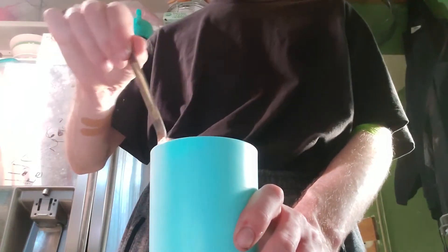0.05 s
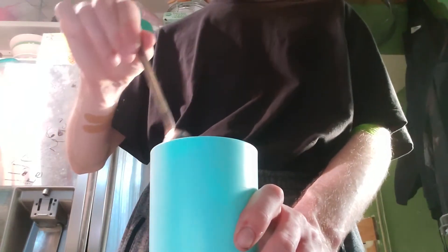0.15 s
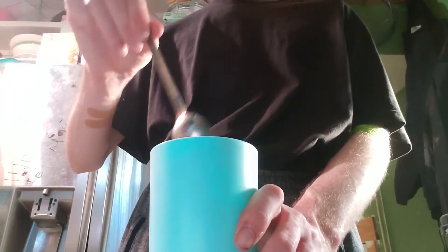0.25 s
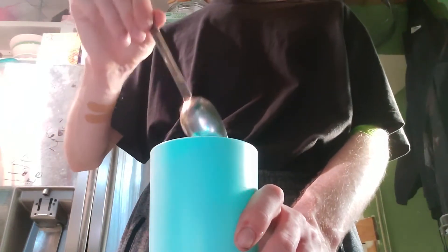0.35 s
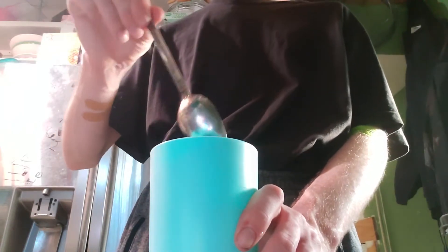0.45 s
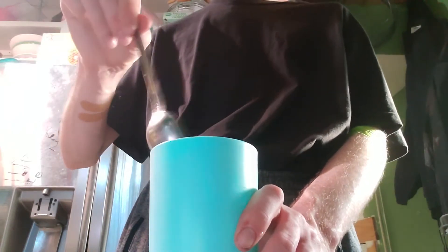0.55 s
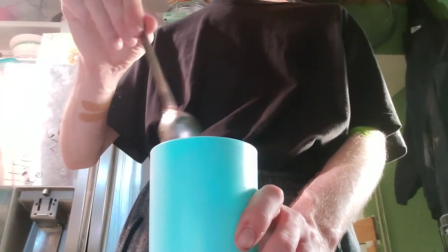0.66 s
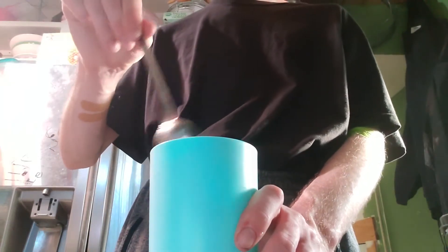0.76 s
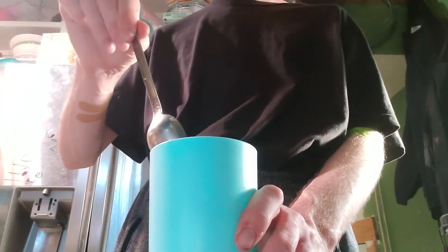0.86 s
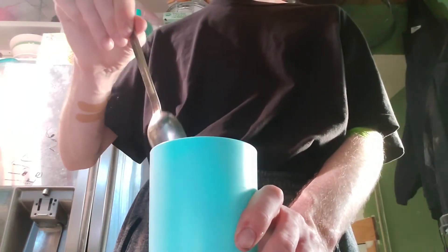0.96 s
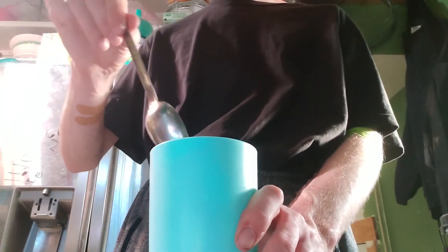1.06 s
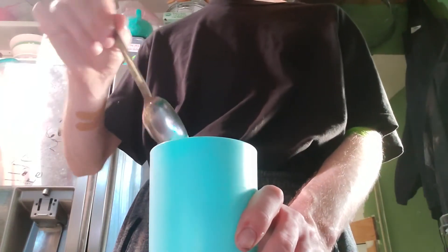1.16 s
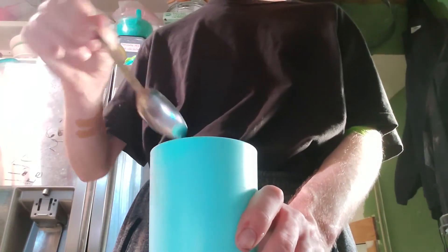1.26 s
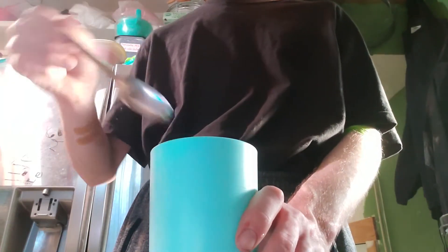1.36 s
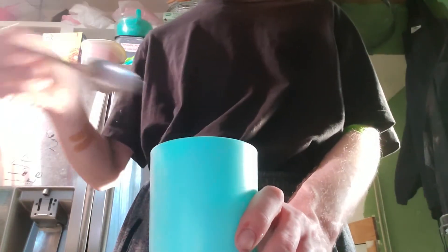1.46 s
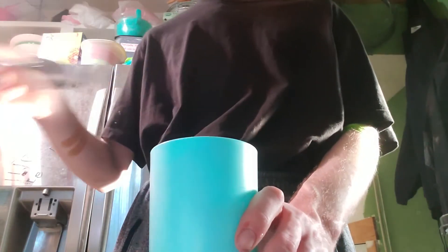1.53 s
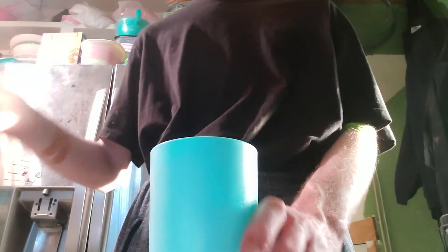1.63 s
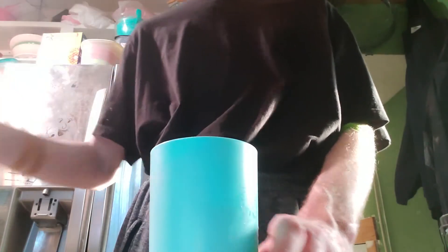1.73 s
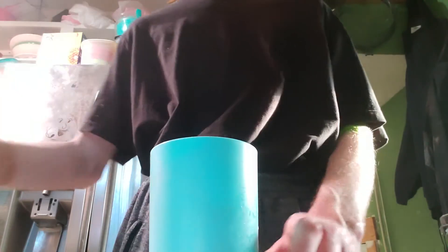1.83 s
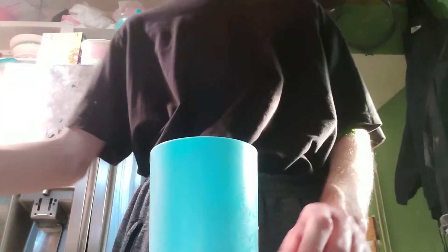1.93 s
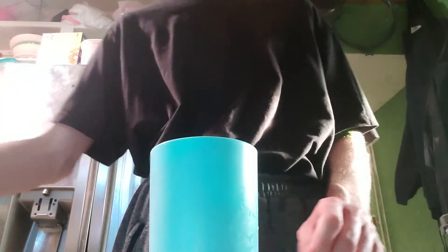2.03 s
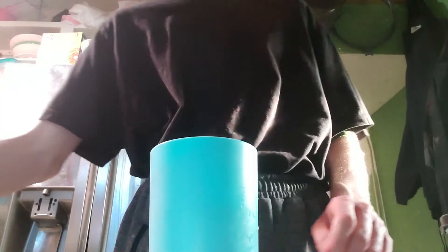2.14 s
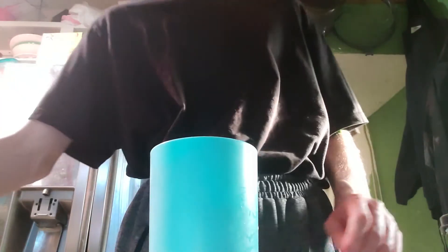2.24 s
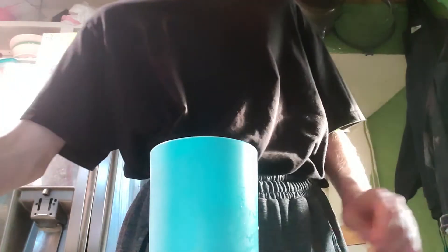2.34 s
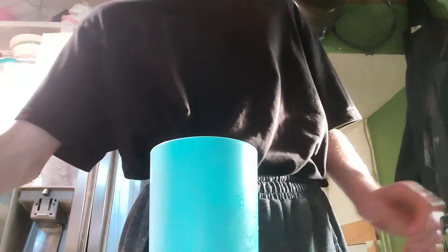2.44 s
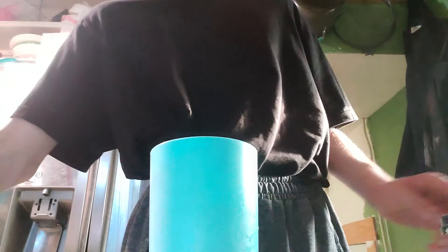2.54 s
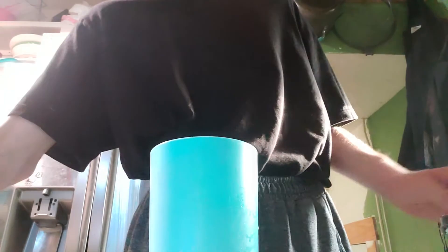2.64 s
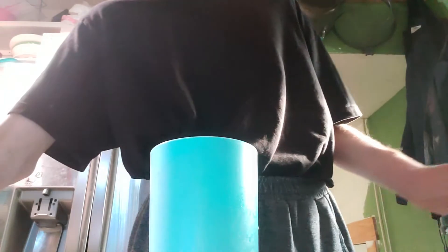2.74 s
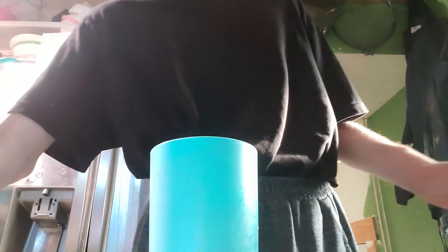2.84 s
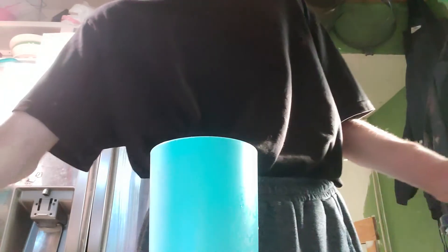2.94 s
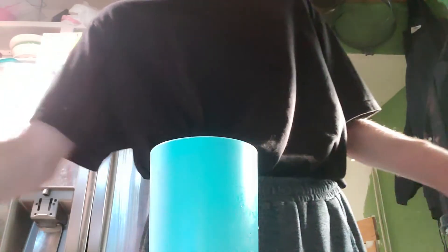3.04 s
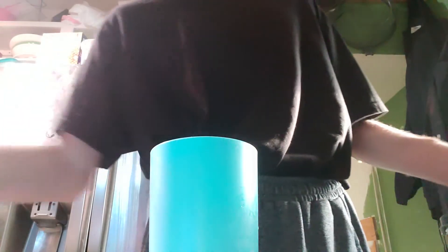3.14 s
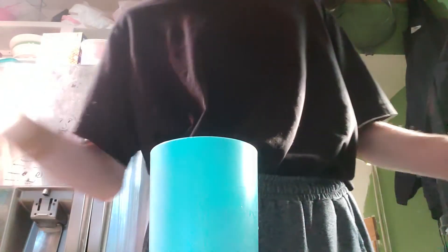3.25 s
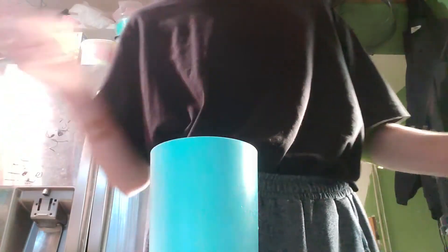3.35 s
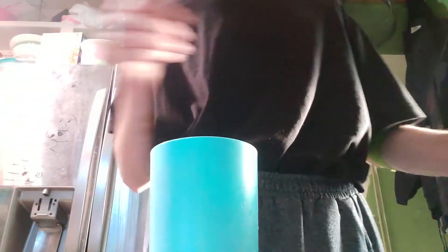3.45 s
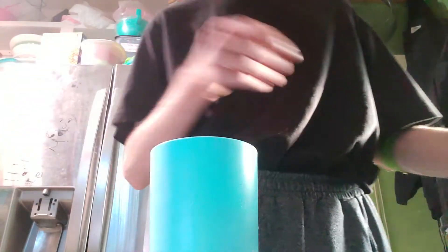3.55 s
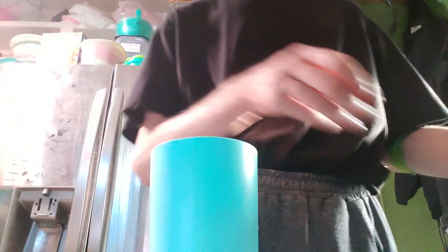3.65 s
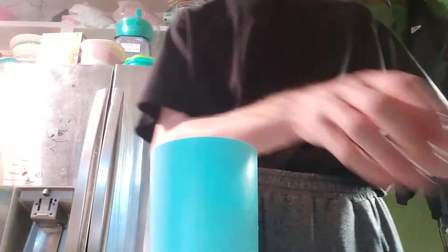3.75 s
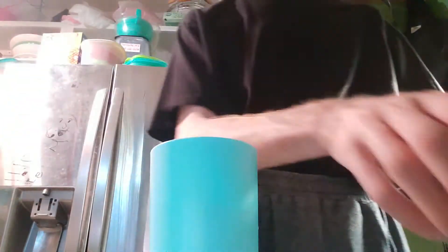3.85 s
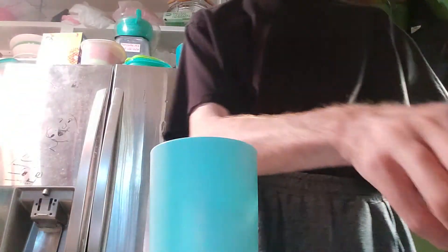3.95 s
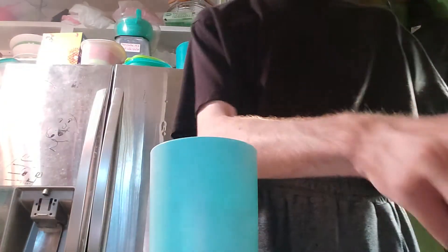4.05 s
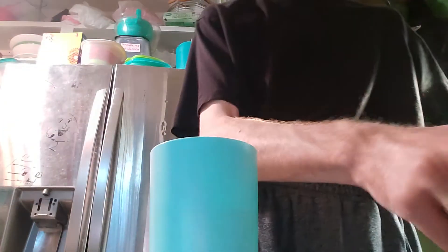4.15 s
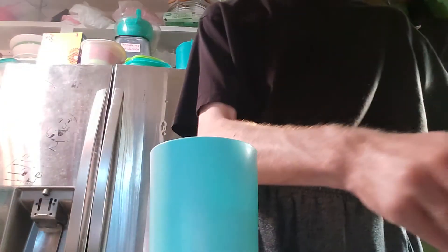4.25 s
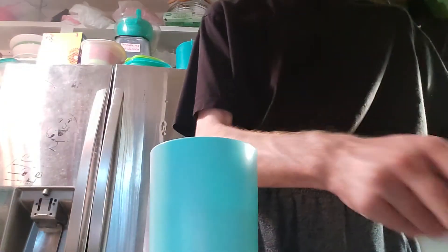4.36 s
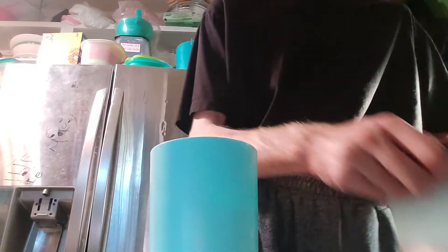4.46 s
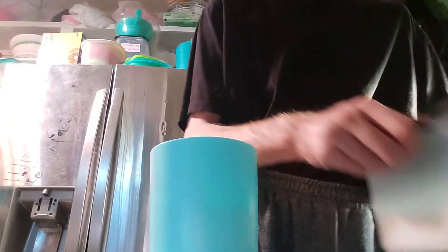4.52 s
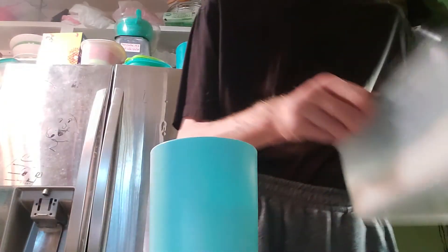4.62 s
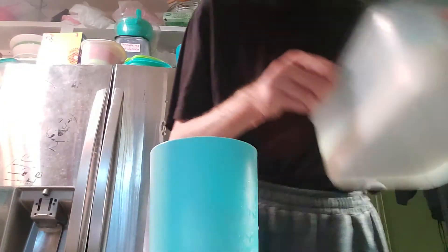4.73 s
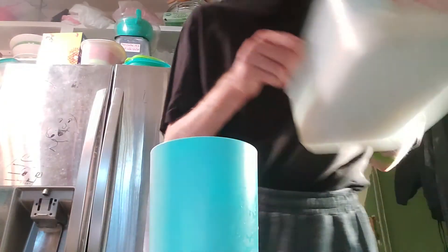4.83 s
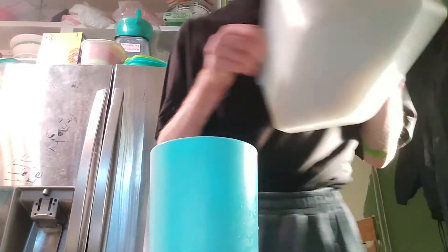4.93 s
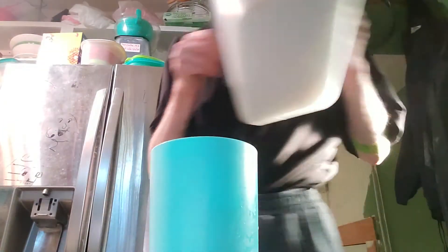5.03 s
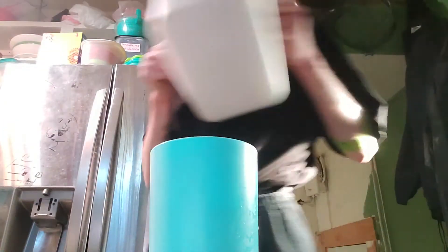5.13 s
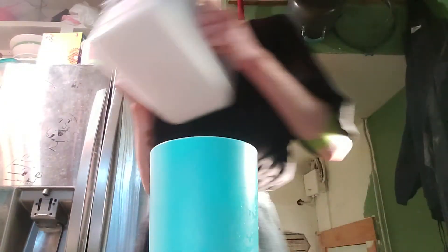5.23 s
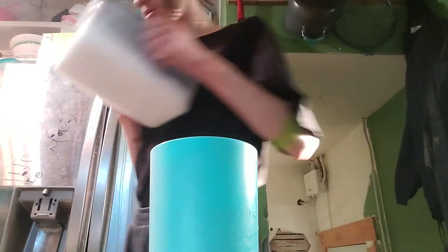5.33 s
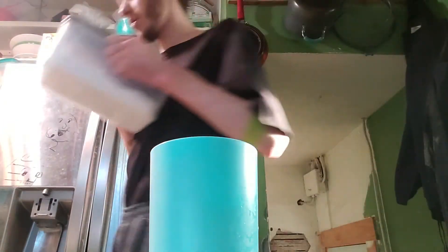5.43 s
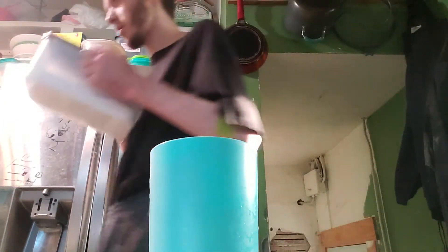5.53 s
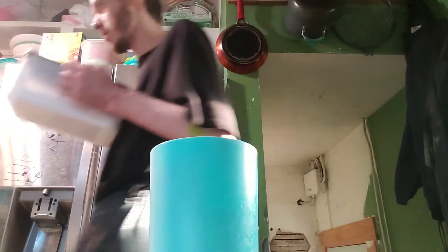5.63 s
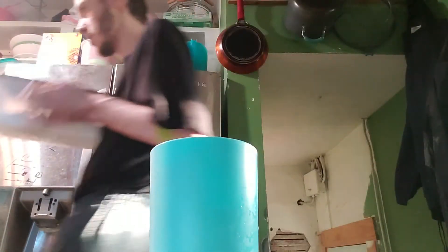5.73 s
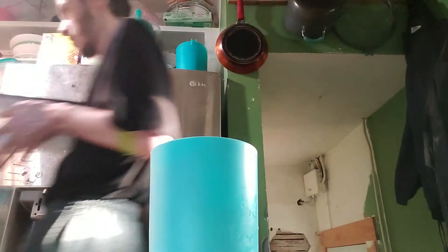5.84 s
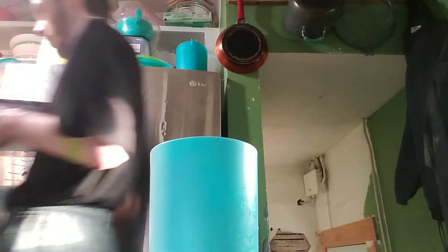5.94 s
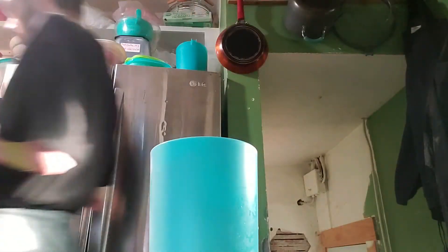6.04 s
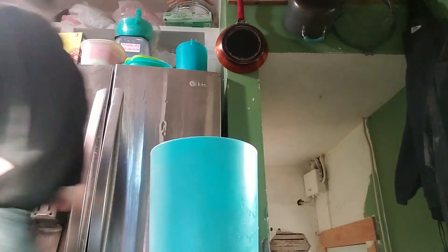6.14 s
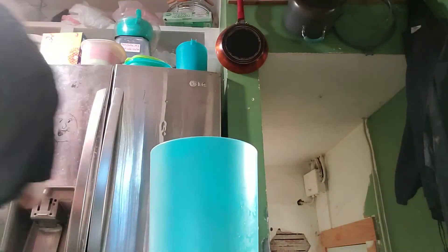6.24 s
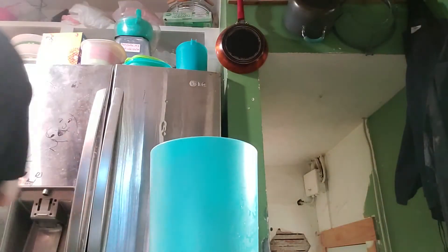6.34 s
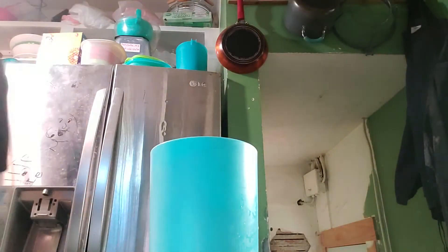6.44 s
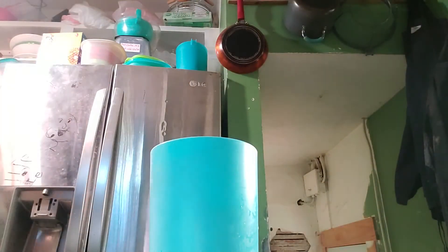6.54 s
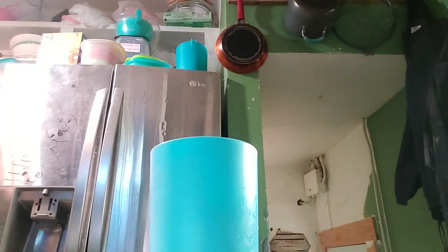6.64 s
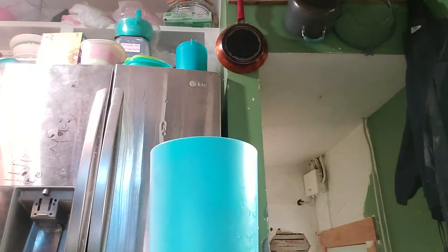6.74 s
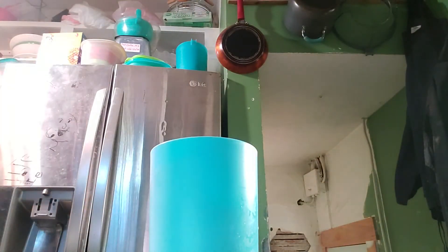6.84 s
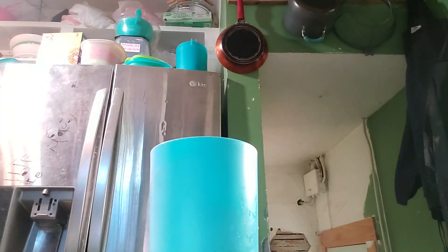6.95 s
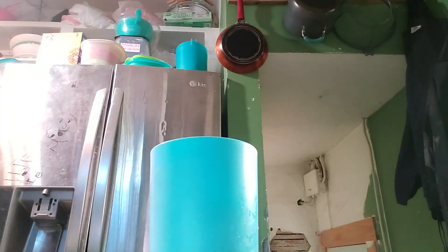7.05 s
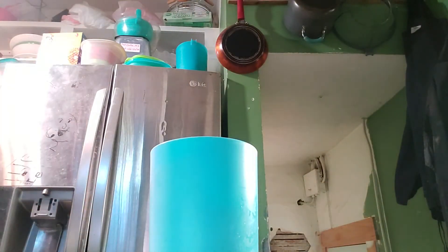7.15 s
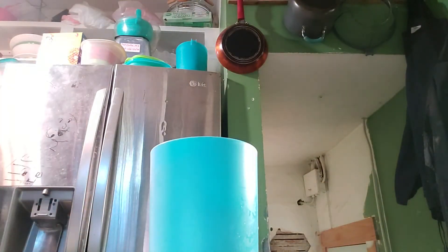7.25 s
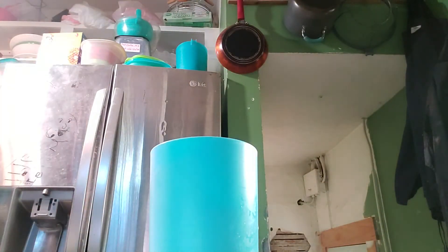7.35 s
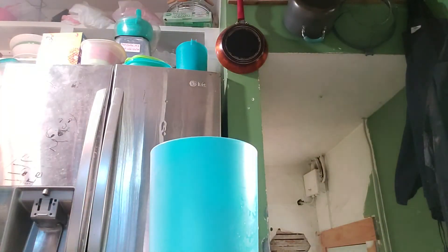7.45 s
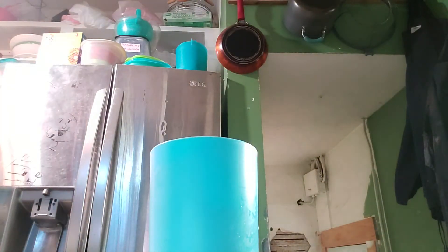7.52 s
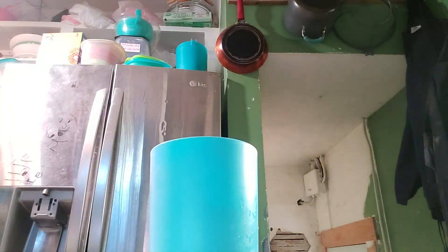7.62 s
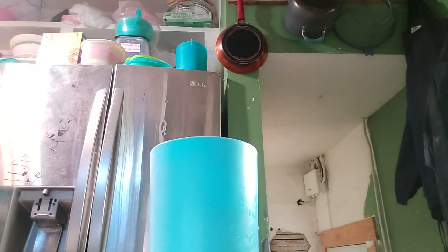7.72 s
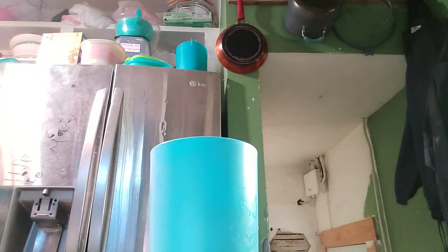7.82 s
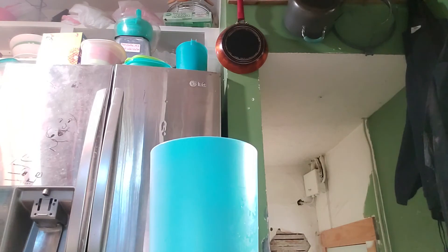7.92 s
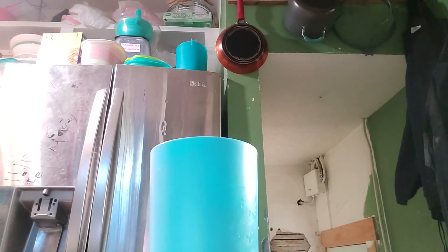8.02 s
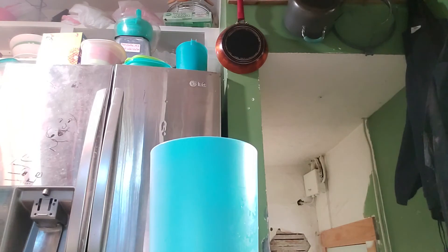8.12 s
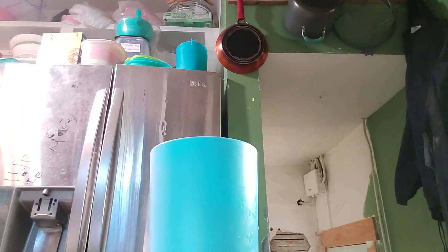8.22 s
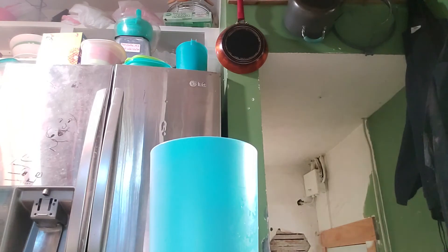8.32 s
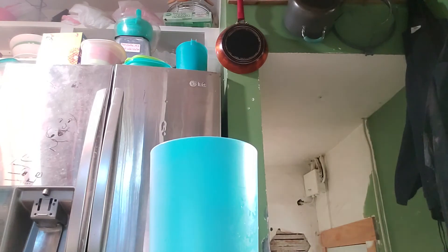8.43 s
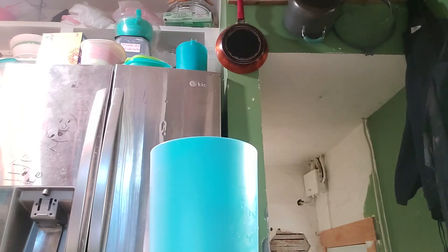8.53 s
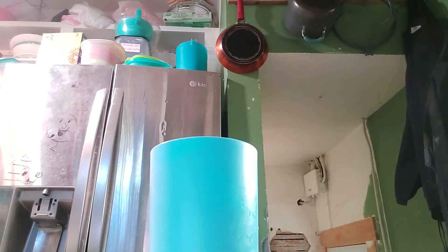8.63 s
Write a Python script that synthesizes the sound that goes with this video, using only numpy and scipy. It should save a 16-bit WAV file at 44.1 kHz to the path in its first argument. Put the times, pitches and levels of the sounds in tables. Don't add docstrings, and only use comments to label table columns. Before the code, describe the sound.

Close up in a small kitchen, a spoon swishes through dry powder and knocks a plastic cup three times, the last hardest. Around three seconds it is put on sheet metal, falls, bounces and rings brightly, quickly damped. A light hollow box knocks at four seconds, then cloth and slippers rustle with soft floorboard thuds and small ticks. A distant motor throbs low throughout.

```python
import sys
import numpy as np
from scipy import signal
from scipy.io import wavfile
from scipy.ndimage import uniform_filter1d

SR = 44100
rng = np.random.default_rng(int(sys.argv[2]) if len(sys.argv) > 2 else 0)


def volts(x):
    e = np.asarray(x, float) / 20
    return 10 ** e


def store_wav(level_fs):
    pcm = np.round(np.clip(np.atleast_2d(level_fs), -1, 1) * 32767)
    wavfile.write(sys.argv[1], SR, pcm.T.astype(np.int16))


N = 382788
TIME = np.arange(N) / SR


# (time [s], body peak [dB], crack [dB], tail [dB])
CUP_KNOCKS = [
    (0.052, -28.5, -38.5, -39.5),
    (0.634, -12, -20, -24),
    (0.858, -5.5, -19.5, -24),
]
# (pitch [Hz], level [dB], t60 [s])
CUP_MODES = [(105.2, -5.5, 0.13), (156.7, 0, 0.15), (174, -7.5, 0.12), (227, -6.5, 0.27),
             (651, -9.5, 0.038), (865, -26, 0.14), (810, -20, 0.083), (1158, -23, 0.1), (1360, -27, 0.1406),
             (1474, -29.5, 0.22), (1730, -23, 0.14)]
# (pitch [Hz], level [dB], t60 [s])
CUP_MODES_AGAIN = [(99, -12.5, 0.13), (138, 8.5, 0.068), (187.3, -8.5, 0.29), (219.6, -8, .28),
                   (263, -15.5, 0.1), (315, -18, 0.18), (396.8, -23.5, 0.2), (650, -23.5, 0.091),
                   (810, -24.5, 0.18), (1174, -30, .15), (1600, -29.5, 0.22)]


def cup_ring():
    ring = strike(CUP_MODES, [row[:2] for row in CUP_KNOCKS[:2]], spread_db=1.5, pan_db=1.1, soft_s=0.000422)
    last = [CUP_KNOCKS[2][:2]]
    return ring + strike(CUP_MODES_AGAIN, last, spread_db=2.5, pan_db=0.8, soft_s=0.0006)


# (pitch [Hz], level [dB per Hz])
CUP_TAIL = [(240, -29), (380, -2.5), (500, -13), (700, -8), (1000, -15.5), (2900, -23), (4500, -25.5),
            (16000, -53.5)]
# (pitch [Hz], t60 [s])
CUP_DECAY = [(420, 0.19), (1100, 0.087), (2910, 0.32), (7680, 0.23), (15000, 0.29)]


def cup_noise(t):
    return knock_power(CUP_KNOCKS, CUP_TAIL, CUP_DECAY, 0.041, t)


# (time [s], body peak [dB], crack [dB], tail [dB])
STEEL_KNOCKS = [
    (2.796, -15.5, -27, -19),
    (3.091, -10.5, -12.5, -12),
    (3.119, -17.5, -25, -15),
    (3.215, -10.5, -19, -10.5),
]
# (pitch [Hz], level [dB], t60 [s])
STEEL_MODES = [(75.6, -5.5, 0.35), (113, -11.5, 0.16), (176.1, -5, 0.33), (181, -6, 0.92), (210, -6.5, 0.1),
               (258, -11.5, 0.57), (306, -8.5, 0.28), (425.5, -16, .29), (610, -2, 0.13), (620, -12, 0.26),
               (741, -12.5, 0.3), (924, -9.5, 0.17), (1200, -14, 0.11), (1497, -11, 0.14)]
# (pitch [Hz], level [dB], t60 [s])
STEEL_MODES_AGAIN = [(81.8, -3.5, 0.26), (114, -5, 0.15), (175.1, -7.5, 0.6), (238.6, -0.5, 0.34),
                     (428, -14, 0.37), (470, -15, 0.4), (594.3, -14.5, 0.46), (748, -18.5, 0.22),
                     (790, -29, 0.65), (933, -14.5, 0.24), (1037, -19, 0.2), (1206, -17.5, 0.11),
                     (1590, -16, 0.31)]
HAND_LIFTS_S, HAND_DB_PER_S = 2.97, 249.5


def steel_ring():
    first = strike(STEEL_MODES, [STEEL_KNOCKS[0][:2]], spread_db=1.6, pan_db=1.8, soft_s=0.0021,
                   wobble_db=2.3, left_first=-0.2)
    first = first * volts(-HAND_DB_PER_S * np.clip(TIME - HAND_LIFTS_S, 0, 1))
    later = strike(STEEL_MODES_AGAIN, [row[:2] for row in STEEL_KNOCKS[1:]], spread_db=1.2, pan_db=-1.4,
                   soft_s=0.0012, wobble_db=2.5, left_first=-1)
    return first + later


# (pitch [Hz], level [dB per Hz])
STEEL_TAIL = [(180, -30), (300, -14.5), (614, -14), (1300, -18.5), (2440, -21), (3700, -25.5),
              (13900, -36.5), (14800, -62)]
# (pitch [Hz], t60 [s])
STEEL_DECAY = [(300, 0.45), (1100, .36), (2910, 0.28), (7680, 0.32), (15000, 0.18)]


def sheet_steel(count=36):
    hz = np.geomspace(1250, 7500, count) * (1 + 0.03 * rng.standard_normal(count))
    level_db = at_hz(STEEL_TAIL, hz) + 10 * np.log10(hz / 1000)
    modes = np.transpose([hz, level_db, at_hz(STEEL_DECAY, hz)])
    hits = [(row[0], row[3] - 9) for row in STEEL_KNOCKS]
    return strike(modes, hits, spread_db=3.5, pan_db=-1.5, soft_s=0.00045, wobble_db=3.0)


# (pitch [Hz], level [dB per Hz])
SET_DOWN_TAIL = [(180, -31), (300, -11), (614, -12.5), (1000, -21), (1530, -19), (2440, -21), (4500, -32),
                 (14500, -43)]
# (pitch [Hz], t60 [s])
FALL_DECAY = [(300, 0.37), (1100, .36), (2910, 0.39), (7680, 0.36), (10500, .1), (15000, 0.06)]


def steel_noise(t):
    set_down = knock_power(STEEL_KNOCKS[:1], SET_DOWN_TAIL, STEEL_DECAY, 0.04, t)
    fall = knock_power(STEEL_KNOCKS[1:3], STEEL_TAIL, FALL_DECAY, 0.04, t)
    bounce = knock_power(STEEL_KNOCKS[3:], STEEL_TAIL, STEEL_DECAY, 0.031, t)
    return set_down + fall + bounce


SPOON_HZ = [1136, 2305, 2745, 2953, 4870, 5497, 6696, 7935, 8414, 9476, 11040, 11348, 12900, 13730]
# (fall [dB], bounce [dB], t60 after fall [s], t60 after bounce [s], left over right [dB])
SPOON = [(-29.5, -45.5, 1.5, .2, 2.5), (-32, -39, 0.27, .27, 0), (-33.5, -39.5, 0.6, 0.44, 1.5),
         (-34, -37, 0.2, .3, -4.5), (-39.5, -40, 0.25, 0.43, 8), (-25, -33, 0.4, 0.62, 9),
         (-30, -31, 0.8, .25, -0.5), (-30, -30.5, 0.6, 0.53, -5.5), (-39, -40.5, 1.0, 0.34, -4),
         (-30, -21.5, 0.45, .3, -7), (-28.5, -34.5, 0.5, 0.3, -5), (-30.5, -36.5, 0.93, 0.5, -5.5),
         (-39, -40, 0.15, .3, -4), (-39, -37, 0.3, .28, -5.5)]
# (phase [turns], swing [dB])
SPOON_FACES = [(.7, 3.5), (.4, 1.5), (0.29, 1.5), (.3, 1), (.25, 2), (.2, 4), (.3, 2.1), (.85, 2),
               (.6, 2.5), (.1, 1.5), (.3, 1.5), (0.29, 1.5), (.16, 2), (.3, 1.5)]
# (pitch [Hz], level [dB])
SPOON_FINE = [(10700, -46.5), (11400, -36), (11520, -37.5), (12300, -41.5), (13300, -41.5), (14210, -39.5),
              (9230, -38), (6080, -36)]
TUMBLE_HZ, BOUNCE_STOPS_DB_PER_S = 8.5, 899.5


def spoon():
    rings, fall, bounce = 0, STEEL_KNOCKS[1][0], STEEL_KNOCKS[-1][0]
    heard = slice(round(fall * SR), round((fall + 1) * SR))
    turns = TUMBLE_HZ * (TIME[heard] - fall)
    fine_modes = [(hz, db, 0.24, -4) for hz, db in SPOON_FINE]
    for k, s in enumerate((fall, bounce)):
        ring = strike(fine_modes, [(s, 0)], spread_db=3.0, pan_db=3.0, soft_s=0.00017, wobble_db=5.0)
        for hz, row, (faces, turn_db) in zip(SPOON_HZ, SPOON, SPOON_FACES):
            facing = volts(turn_db * np.cos(2 * np.pi * (turns - faces)))
            mode = strike([(hz, row[k], row[2 + k], row[-1])], [(s, 0)], spread_db=1.4, pan_db=1.34,
                          soft_s=0.00017, wobble_db=2.5)
            ring[:, heard] += facing * mode[:, heard]
        if k == 0:
            ring = ring * volts(-BOUNCE_STOPS_DB_PER_S * np.clip(TIME - bounce, 0, 1))
        rings = rings + ring
    return rings * resting(222)


SPOON_RESTS_S = 3.345


def resting(db_per_s):
    return volts(-db_per_s * np.clip(TIME - SPOON_RESTS_S, 0, 1))


# (full at [s], swell [s], hold [s], dull part [dB], brightness of hiss over it [dB])
STIRS = [
    (.1, 0.083, 0.03, -66.5, -0.5),
    (.24, 0.042, 0.037, -81.5, 16),
    (.38, 0.069, 0.06, -76, 12),
    (0.559, 0.059, 0.14, -67, 9.5),
]
# (pitch [Hz], level [dB per Hz])
POWDER = [(2000, -44.5), (3400, -12), (3820, -27), (4160, -0.5), (5060, -3.5), (6080, -3), (7700, -29),
          (10000, -47.5)]
STIR_DIES_DB_PER_S = 167


def stir_power(t):
    return rubbing_power(t, STIRS, POWDER, STIR_DIES_DB_PER_S, -17)


# (time [s], level [dB])
JOLTS = [
    (.06, -71.5),
    (0.661, -67),
    (.87, -60),
    (.97, -66),
    (1.079, -69.5),
    (1.16, -75),
]
# (pitch [Hz], width [Hz], level [dB])
HELD_SPOON = [(2905, 280, 1), (5200, 170, -4.5), (13750, 63, -16)]


def held_spoon():
    white = rng.standard_normal((2, N))
    modes = 0
    for hz, width, db in HELD_SPOON:
        song = rms_one(resonate(resonate(white, hz, width), hz, width))
        modes = modes + volts(db + 2.5 * drift(5.4)) * song
    power = 0
    for s, db in JOLTS:
        power = power + volts(db) ** 2 * rub(TIME, s, 0.02, 0, 125.5)
    for s, swell, hold, db, bright_db in STIRS:
        under_stir = volts(db + bright_db - 13) ** 2
        power = power + under_stir * rub(TIME, s, swell, hold, STIR_DIES_DB_PER_S)
    return modes * np.sqrt(power)


# (time [s], body peak [dB], crack [dB], tail [dB])
BOX_KNOCKS = [
    (4.1236, -9, -20, -41.5),
    (4.129, -40, -27, -38.5),
]
# (pitch [Hz], level [dB], t60 [s])
BOX_MODES = [(162.6, -21, 0.29), (227, -9.5, 0.13), (251, 2.5, 0.039), (503, -5.5, 0.04),
             (602, -11.5, 0.04), (820, -16, 0.053)]


def box_ring():
    return strike(BOX_MODES, [row[:2] for row in BOX_KNOCKS], spread_db=-1.0, pan_db=1.0, soft_s=0.0015)


# (pitch [Hz], level [dB per Hz])
BOX_TAIL = [(100, 0), (255, 7), (415, -17), (818, -18.5), (1150, -40), (2220, -39), (4500, -51),
            (16000, -73.5)]
# (pitch [Hz], t60 [s])
BOX_DECAY = [(100, 0.023), (1000, 0.45), (5000, 0.24), (14000, 0.12)]


def box_noise(t):
    return knock_power(BOX_KNOCKS, BOX_TAIL, BOX_DECAY, 0.031, t)


# (time [s], pitch [Hz], level [dB], t60 [s])
TAPS = [(.893, 206.3, -22.5, 0.22), (0.954, 1180, -42, 0.086), (.962, 2960, -40, .08),
        (0.964, 4170, -48, .04), (.052, 2920, -44, 0.06), (0.051, 1590, -49, 0.1),
        (4.666, 720, -53.5, 0.039), (3.04, 243, -40, .15), (3.047, 1700, -38, 0.037),
        (3.955, 1920, -59, 0.12), (4.088, 257, -39, 0.14), (4.106, 333, -32.5, 0.068),
        (4.255, 793, -39.5, .08), (4.31, 846, -34, 0.045), (5.921, 1320, -52, 0.05),
        (5.94, 1640, -53, 0.044), (6.33, 2470, -58, .05), (6.8, 726, -56, 0.053), (3.116, 1252, -17, .07),
        (3.14, 638.5, -24.5, .08), (3.185, 439.3, -27, .25), (3.217, 440.3, -16.5, .12),
        (3.252, 943, -20, .12), (3.296, 610, -31, 0.047), (2.8, 641.4, -22, .1), (5.191, 252, -41, .15),
        (.645, 655, -35, 0.1)]


def taps():
    out = 0
    for s, hz, db, t60 in TAPS:
        pair = [(hz, 0, t60), (0.93 * hz, -3, t60)]
        out = out + strike(pair, [(s, db)], spread_db=-4.5, pan_db=3.0, soft_s=0.00094)
    return out


# (full at [s], swell [s], hold [s], dull part [dB], brightness [dB])
SLIDES = [(.965, 0.062, 0.0037, -45, -7.5), (1.0, .02, 0.073, -67.5, -3), (1.06, 0.066, 0.1, -75, -2),
          (1.2, 0.044, 0.032, -81, -11), (2.91, 0.061, 0.0081, -44.5, -9), (3.01, 0.058, 0.1, -45.5, -11),
          (3.3, 0.047, 0.036, -38.5, -2.5), (3.49, 0.025, 0.029, -73, -28),
          (3.96, 0.027, 0.025, -55.5, -21), (4.06, 0.055, .05, -67.5, -18),
          (4.17, 0.06, 0.021, -62.5, -6.5), (4.25, 0.058, 0.022, -51.5, -16.5),
          (4.315, 0.02, 0.0076, -43.5, -15), (4.39, .03, 0.023, -62, -9), (4.48, 0.062, 0.026, -63, -12),
          (4.55, 0.029, 0.032, -71.5, -14)]
# (pitch [Hz], level [dB per Hz])
HISS = [(2000, -24.5), (3400, -3), (4090, 1), (4500, -10), (4970, 1.5), (6420, -1.5), (7700, -20),
        (10000, -42.5)]


def slide_power(t):
    return rubbing_power(t, SLIDES, HISS, 422.5, -12)


# (time [s], peak [dB], top part [dB])
TICKS = [(0.896, -26.5, -22), (.972, -33, -32), (2.86, -38, -16), (3.285, -19, -4), (1.43, -69, 3),
         (3.047, -25.5, -26), (3.145, -24, -14), (3.258, -16, -11.5), (7.358, -63, -23),
         (7.515, -61.5, -19.5), (3.5356, -54, -26), (3.869, -73, -25.5), (3.927, -62, -25),
         (3.9519, -54, -31), (4.104, -52, -32), (4.22, -50, -25.5), (4.47, -57.5, -20),
         (4.2479, -39.5, -24), (4.316, -38, -26), (4.3844, -51.5, -27), (4.6664, -48, -10.5),
         (4.831, -59.5, 5), (5.1244, -58, -23.5), (5.233, -45.5, -20.5), (5.447, -47, -10),
         (5.643, -63.5, -19.5), (5.698, -51, -18), (5.921, -56, -26.5), (6.118, -48, -21),
         (6.725, -61, -20), (6.925, -59.5, -20), (5.9883, -47, -27), (6.2006, -39, -24), (6.5474, -50, -24),
         (6.789, -42, -25), (6.9721, -54, -31), (7.5903, -55, -7), (7.845, -38.5, -24.5),
         (8.1, -65.5, -19.5), (8.149, -61, -24.5), (8.374, -61, -20), (8.5337, -41, -33)]
TICK_T60_S = 0.035


def tick_power(t):
    low = band_power([(800, 10.5), (2500, 4.5), (5500, -7.0), (7500, -12)])
    top = band_power(TOP) + band_power(HISS)
    out = np.zeros((len(CENTRES_HZ), len(t)))
    for s, db, top_db in TICKS:
        near = (t >= s) & (t < s + 2 * TICK_T60_S)
        decay = volts(db - 8.0 - 60 * (t[near] - s) / TICK_T60_S) ** 2
        out[:, near] += (low + top * volts(top_db) ** 2) * onset(t[near], s) * decay
    return out


# (full at [s], swell [s], hold [s], dull part [dB], brightness [dB])
STEPS = [(4.85, 0.25, 0.25, -75.5, -8), (5.17, 0.059, 0.035, -49, -14), (5.25, 0.041, 0.13, -57.5, -11.5),
         (5.4, 0.091, 0.045, -52, -9), (5.7, 0.032, 0.18, -68.5, -5.5), (5.92, 0.079, 0.093, -62, -13.5),
         (6.05, .04, 0.032, -65.5, -18.5), (6.14, 0.072, 0.043, -62, -11), (6.21, 0.04, 0.024, -48.5, -10),
         (6.29, 0.043, 0.076, -47.5, -10), (6.4, .03, 0.035, -55, -8.5), (6.56, 0.02, 0.014, -58.5, -10.5),
         (6.75, 0.054, 0.018, -66.5, -1.5), (6.8, 0.042, 0.0075, -53, -8), (6.94, 0.023, 0.14, -55, -10.5),
         (7.0, 0.068, 0.15, -48, -11), (7.6, 0.026, 0.069, -66.5, 1.5), (7.75, 0.041, 0.097, -58.5, -6.5),
         (7.85, 0.075, 0.014, -52.5, -12), (8.16, 0.023, 0.12, -65.5, -12),
         (8.33, .04, 0.064, -63.5, -12.5), (8.44, 0.019, 0.038, -67, -2.5), (8.54, 0.037, 0.18, -55.5, -11)]


def step_power(t):
    return rubbing_power(t, STEPS, HISS, 188, -12)


def rustle_power(t):
    rubbing = stir_power(t) + slide_power(t) + step_power(t)
    return rubbing * volts(0.82 * drift(37)[::16]) ** 2


# (time [s], peak [dB])
THUDS = [(3.946, -34), (4.313, -28.5), (4.665, -37.5), (5.125, -30.5), (5.2, -29), (6.362, -30),
         (6.398, -40), (6.931, -29), (6.957, -29.5), (7.85, -40)]
# (pitch [Hz], level [dB], t60 [s])
FLOORBOARD = [(87, 5, 0.11), (111.6, -5.5, 0.25), (211, 5, 0.13)]


def thuds():
    return strike(FLOORBOARD, THUDS, spread_db=4.0, pan_db=0.9, soft_s=0.00044)


# (multiple of the stroke rate, level [dB])
MOTOR = [(2, -33.5), (3, -13), (4, -17), (5, -6.5), (6, -9.5), (7, -9.5), (8, -1), (9, -12.5), (10, -8.5),
         (11, -11.5), (12, -11), (13, -11), (14, -27), (15, -24.5), (16, -18.5), (17, -7.5), (18, -16.5),
         (19, -10.5), (20, -19.5), (21, -3.5), (22, -23), (23, -13.5), (24, -14), (25, -17), (26, -19.5),
         (27, -28.5), (28, -22), (29, -28), (30, -29), (31, -20.5)]
STROKES_DB = [1, 0, 1]
STROKES_LATE = [0, 0.005, -0.004]
MOTOR_HZ, MOTOR_DB = 18.9, -48


def motor():
    turn = MOTOR_HZ * TIME - 2.51 + 0.0071 * drift(0.84)
    strength = volts(np.interp(turn % 3, range(4), STROKES_DB + STROKES_DB[:1]))
    turn = turn - np.interp(turn % 3, range(4), STROKES_LATE + STROKES_LATE[:1])
    out = 0
    for multiple, db in MOTOR:
        apart = np.arccos(likeness(multiple * MOTOR_HZ)) / 2
        luck = 0.6 * rng.standard_normal()
        phase = 2 * np.pi * multiple * turn + 2 * np.pi / 3 * (multiple % 3 == 2) + luck
        out = out + volts(db + 1.9 * drift(0.43)) * np.cos(phase + apart * np.array([[1], [-1]]))
    return volts(MOTOR_DB) * rms_one(out * strength * volts(1.8 * drift(36)))


# (pitch [Hz], width [Hz], level [dB])
CASING = [(587, 12, -73), (694, 68, -78), (846, 30, -85)]


def casing():
    white = rng.standard_normal(N) + 0.5 * rng.standard_normal((2, N))
    out = 0
    for hz, width, db in CASING:
        out = out + volts(db) * rms_one(resonate(resonate(white, hz, width), hz, width))
    return out


# (pitch [Hz], level [dB per Hz])
AIR = [(20, -18.5), (141, -2.5), (275, -19.5), (380, -10.5), (560, -21), (640, -29), (870, -36),
       (1000, -60)]
# (pitch [Hz], level [dB per Hz])
SELF_NOISE = [(560, -33.5), (1220, -4.5), (2400, -9.5), (3900, -15), (5030, -9), (7340, -21), (11800, -12),
              (16000, -16)]


def background_power():
    return band_power(AIR) * volts(-57) ** 2 + band_power(SELF_NOISE) * volts(-80) ** 2


def strike(modes, hits, spread_db, pan_db, soft_s, wobble_db=0, left_first=1):
    out = np.zeros((2, N))
    for s, level_db in hits:
        i = round(s * SR)
        for (hz, db, t60, *lean_db), luck in zip(modes, rng.standard_normal((len(modes), 5))):
            t = TIME[:min(round(SR * min(1.5 * t60, 0.7)), N - i)]
            wobble = np.sin(2 * np.pi * (9 * t + luck[3]))
            wobble = wobble + np.sin(2 * np.pi * ((23 + 4 * luck[3]) * t + luck[4]))
            db = level_db + db + spread_db * luck[0] + wobble_db * wobble
            build_up = (1 - np.exp(-t / (soft_s + 0.37 / hz))) ** 2
            shape = volts(db - 60 * t / t60) * build_up
            first = np.sign(luck[1]) if hz > 900 else left_first
            apart = first * np.arccos(likeness(hz)) / 2
            for k, side in enumerate((1, -1)):
                lean = volts(side * (pan_db * luck[2] + sum(lean_db) / 2))
                out[k, i:i + len(t)] += shape * lean * np.sin(2 * np.pi * hz * t + side * apart)
    return out


CRACK_TILT = 0.78


def knock_power(knocks, spectrum, decay, crack_t60, t):
    out, share = 0, band_power(spectrum)
    share = share / share[CENTRES_HZ > 600].sum()
    t60 = at_hz(decay, CENTRES_HZ)[:, None]
    tilt = (CENTRES_HZ / 2500) ** CRACK_TILT / (1 + (CENTRES_HZ / 14000) ** 8)
    bright = ((CENTRES_HZ > 900) * tilt)[:, None]
    for s, _, crack_db, tail_db in knocks:
        age = np.maximum(t - s, 0)
        crack = volts(crack_db - 60 * age / crack_t60) ** 2 * bright
        tail = volts(tail_db - 9.0 - 60 * age / t60 + 2.0 * drift(30)[::16]) ** 2
        out = out + onset(t, s) * share * (crack + tail)
    return out


# (pitch [Hz], level [dB per Hz])
DULL = [(240, -30), (400, -7.5), (714, -8), (994, -14), (2150, -16.5), (2540, -13.5), (3600, -23),
        (4680, -56.5)]
# (pitch [Hz], level [dB per Hz])
TOP = [(4290, -30), (7300, -5), (8160, -4), (9100, -6), (12200, -3), (14800, -21), (16000, -29)]


def rubbing_power(t, rows, hiss, dies_db_per_s, top_db):
    out, bright = 0, band_power(hiss) + band_power(TOP) * volts(top_db) ** 2
    for s, swell, hold, db, bright_db in rows:
        colour = band_power(DULL) + bright * volts(bright_db) ** 2
        out = out + colour * volts(db) ** 2 * rub(t, s, swell, hold, dies_db_per_s)
    return out


SWELL_DB = 23


def rub(t, s, swell, hold, dies_db_per_s):
    rise = np.clip((t - s) / max(swell, 0.005), -4, 0)
    fall_db = dies_db_per_s * np.maximum(t - s - hold, 0)
    return volts(SWELL_DB * rise * (1 - rise) / 2 - fall_db) ** 2


EDGES_HZ = np.append(30 * 2 ** np.arange(0, 4, 1 / 2), 480 * 2 ** np.arange(0, 5.1, 1 / 5))
CENTRES_HZ = np.sqrt(EDGES_HZ[1:] * EDGES_HZ[:-1])


def noise_of(power, patchy_db):
    out, white = 0, rng.standard_normal((2, 2, N))
    for k, hz in enumerate(CENTRES_HZ):
        sos = signal.butter(2, EDGES_HZ[k:k + 2], "band", fs=SR, output="sos")
        mid, side = rms_one(signal.sosfilt(sos, white[k % 2]))
        alike = likeness(hz)
        gain = np.sqrt(np.interp(TIME, TIME[::16], power[k]) / 2) * volts(patchy_db * drift(15))
        out = out + gain * (np.sqrt(1 + alike) * mid + np.sqrt(1 - alike) * side * [[1], [-1]])
    return out


def band_power(spectrum):
    inside = (CENTRES_HZ > spectrum[0][0]) & (CENTRES_HZ < spectrum[-1][0])
    power = volts(at_hz(spectrum, CENTRES_HZ)) ** 2 * np.diff(EDGES_HZ) * inside
    return (power / power.sum())[:, None]


def onset(t, s):
    return np.clip((t - s) * CENTRES_HZ[:, None], 0, 1) ** 2


# (pitch [Hz], correlation)
LIKENESS = [(60, 0.81), (130, 1), (290, 0.9), (640, 0.45), (1410, -0.14), (3100, -0.085), (6820, 0.18),
            (15000, -0.44)]


def likeness(hz):
    return np.clip(at_hz(LIKENESS, hz), -1, 1)


def resonate(x, hz, width):
    r = np.exp(-np.pi * width / SR)
    poles = [1, -2 * r * np.cos(2 * np.pi * hz / SR), r * r]
    return signal.lfilter([(1 - r * r) / 2, 0, (r * r - 1) / 2], poles, x)


def drift(rate):
    r = np.exp(-80 * np.pi * rate / SR)
    white = rng.standard_normal(N // 40 + 2002)
    slow = signal.lfilter([1], [1, -2 * r, r * r], white)[2000:]
    return np.interp(np.arange(N) / 40, np.arange(len(slow)), rms_one(slow))


def rms_one(x):
    return x / np.sqrt(np.mean(x ** 2) + 1e-20)


def at_hz(points, hz):
    table = np.array(points)
    return np.interp(np.log(hz), np.log(table[:, 0]), table[:, 1])


def scene():
    t = TIME[::16]
    power = cup_noise(t) + steel_noise(t) + box_noise(t)
    power = power + rustle_power(t) + tick_power(t) + background_power()
    steel = (volts(-2.0) * steel_ring() + sheet_steel()) * resting(55)
    struck = volts(-2.0) * (cup_ring() + box_ring()) + steel + volts(-7.5) * thuds()
    no_bass = signal.butter(3, 62, "high", fs=SR, output="sos")
    struck = signal.sosfilt(no_bass, struck + 1e-18)
    ringing = struck + spoon() + held_spoon() + taps()
    return noise_of(power, patchy_db=2.5) + ringing + motor() + casing()


# (pitch [Hz], width [Hz], added [dB])
PORTS = [(2700, 810, -10), (5000, 350, -0.5)]


def microphone(x):
    x = signal.sosfilt(signal.butter(3, 48, "high", fs=SR, output="sos"), x)
    x = signal.sosfilt(signal.butter(8, 15500, fs=SR, output="sos"), x)
    x = x - 0.34 * resonate(x, 3500, 710)
    return x + sum(volts(db) * resonate(x, hz, width) for hz, width, db in PORTS)


def top_cut(x):
    return signal.sosfilt(signal.butter(12, 16470, fs=SR, output="sos"), x)


def record(dry):
    level_db = 10 * np.log10(uniform_filter1d(np.mean(dry ** 2, axis=0), 441) + 1e-9)
    cut_db = 0.26 * np.maximum(level_db + 29.5, 0)
    held_db = np.maximum.accumulate(cut_db + 1.775 * TIME) - 1.638 * TIME
    r = np.exp(-1 / (0.13 * SR))
    gain = volts(4.5 - signal.lfilter([1 - r], [1, -r], held_db))
    x = microphone(dry) * gain * volts([[-0.4], [0.4]])
    mix = 1.006 * np.tanh(x / 1.094)
    return top_cut(mix)


dry = scene()
out = record(dry)
store_wav(out)
```